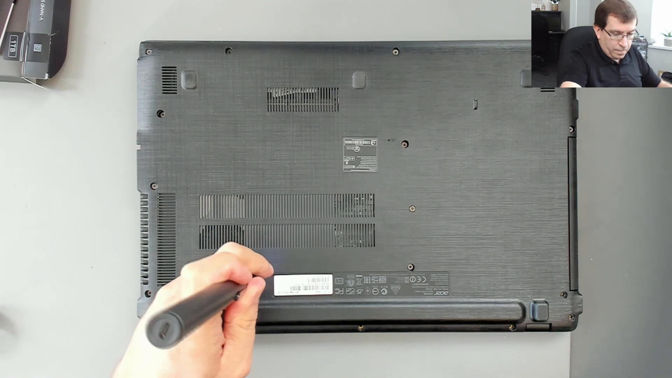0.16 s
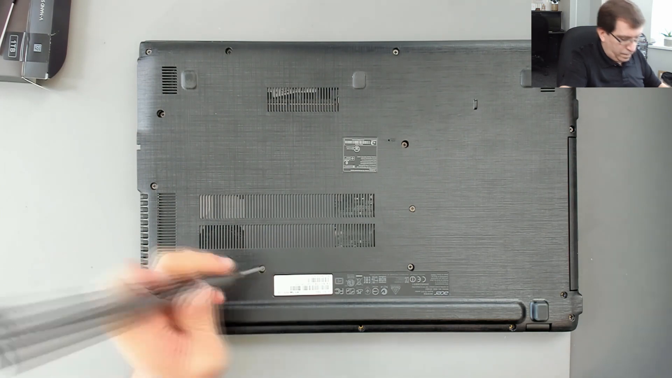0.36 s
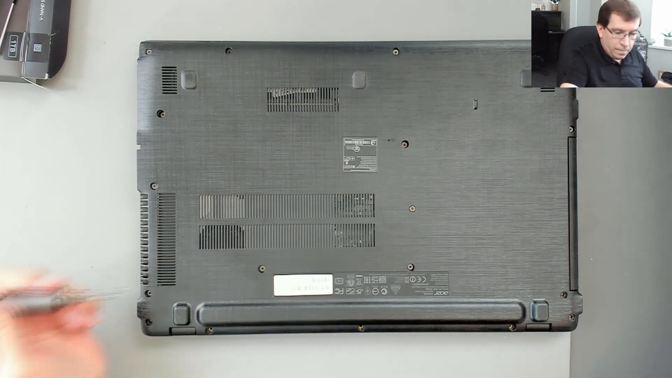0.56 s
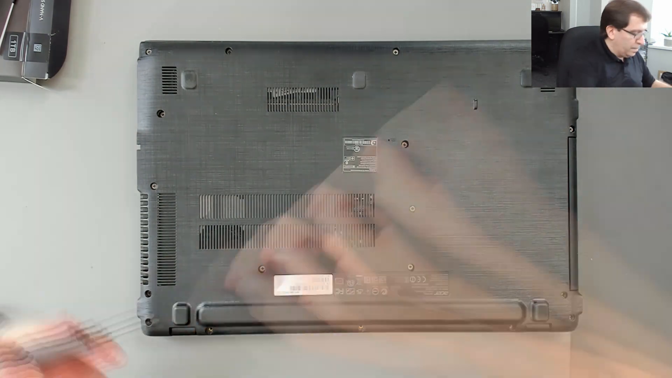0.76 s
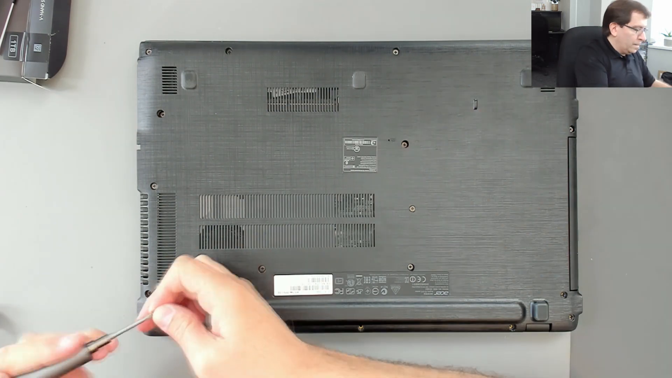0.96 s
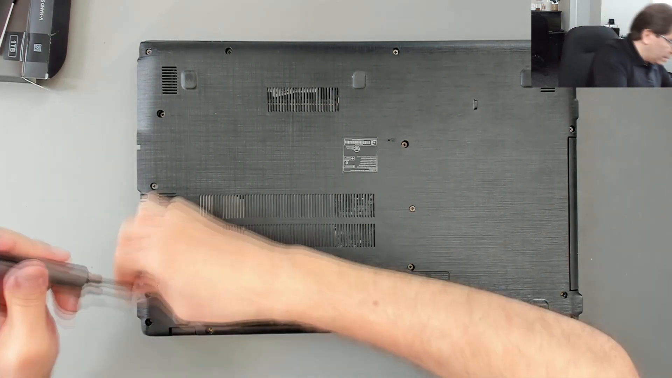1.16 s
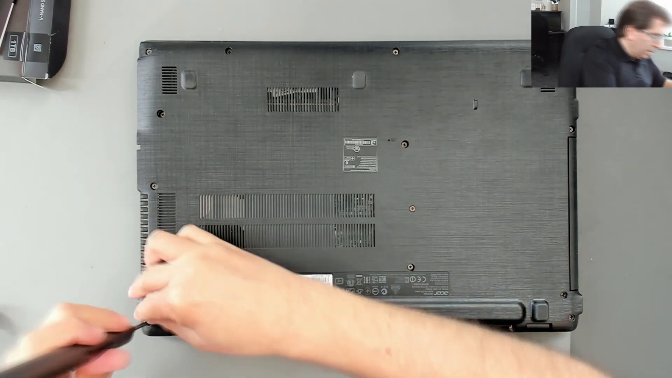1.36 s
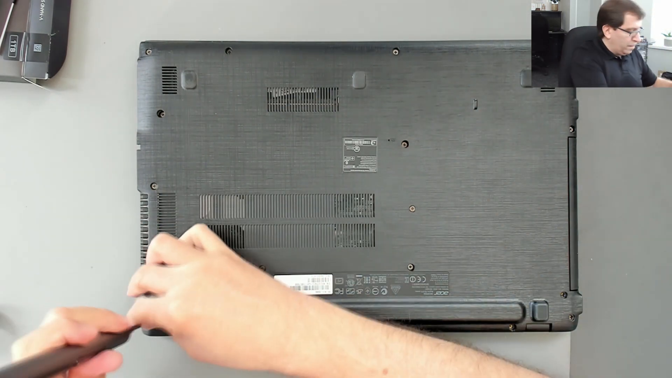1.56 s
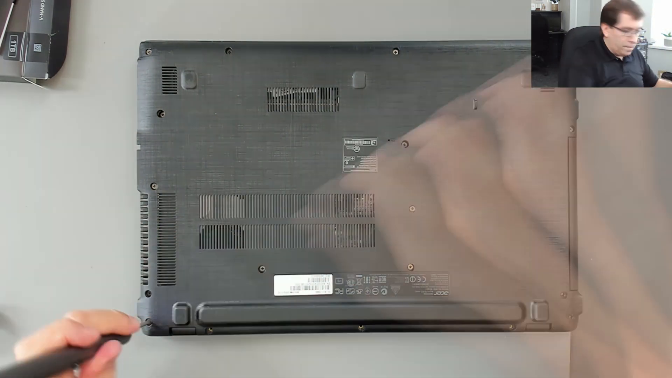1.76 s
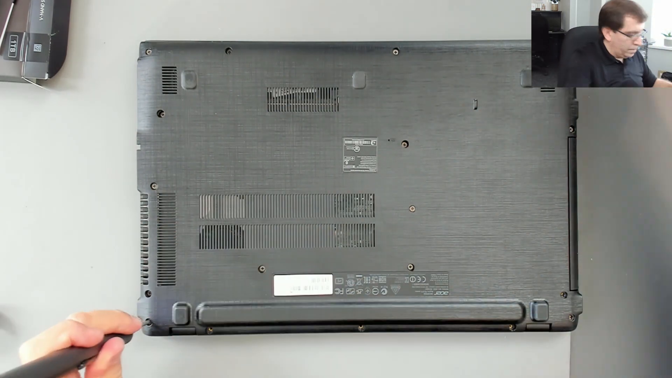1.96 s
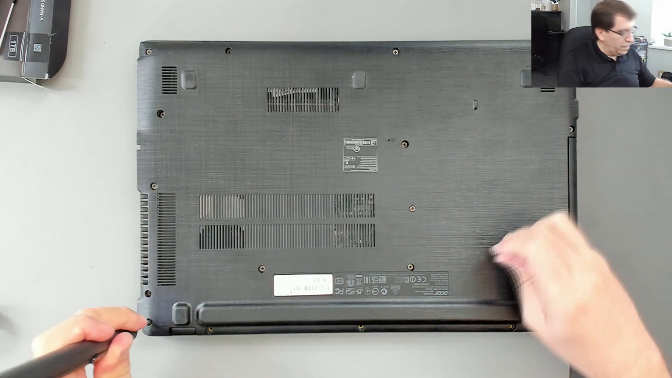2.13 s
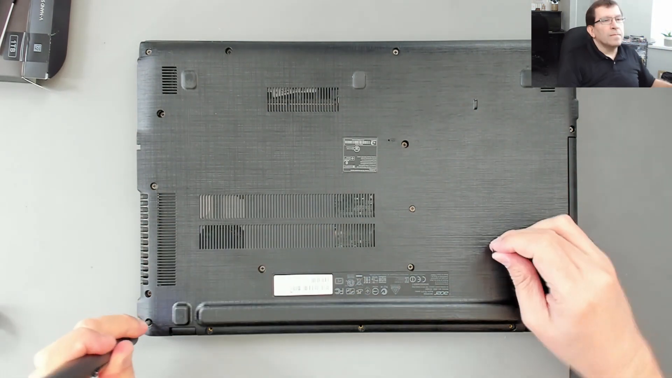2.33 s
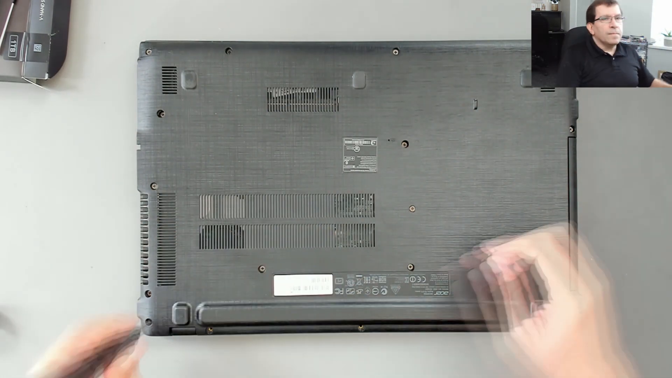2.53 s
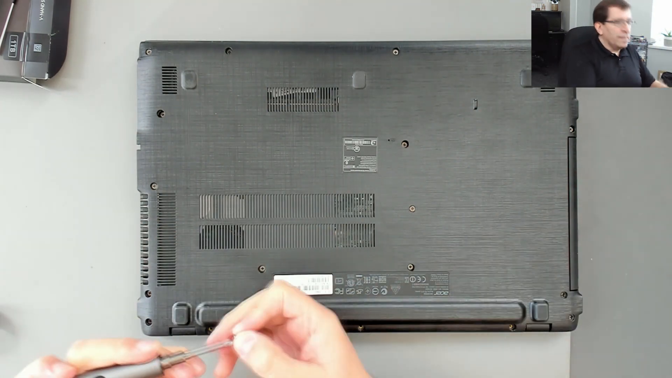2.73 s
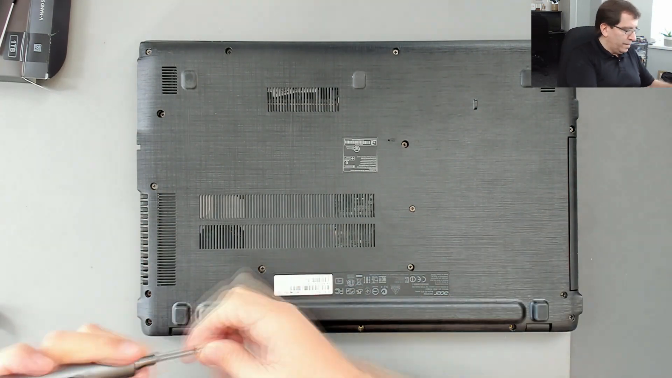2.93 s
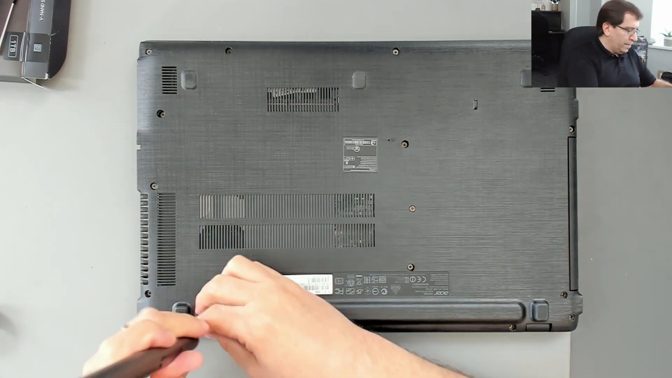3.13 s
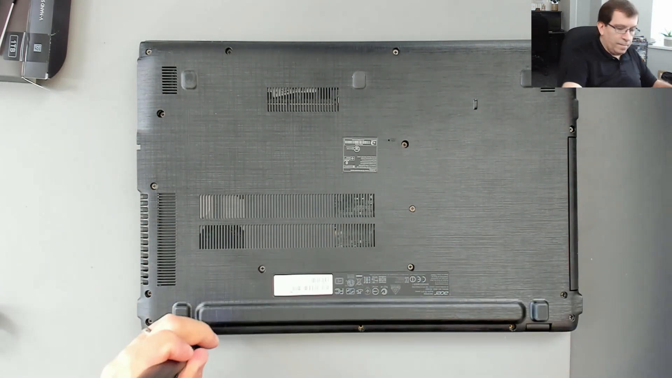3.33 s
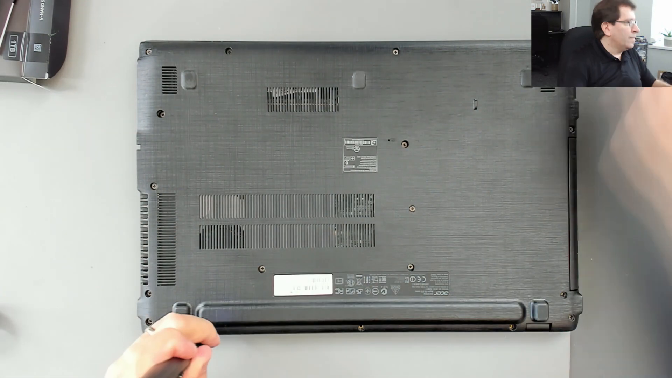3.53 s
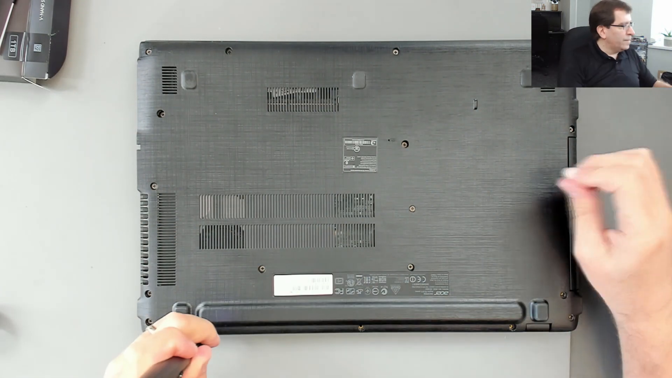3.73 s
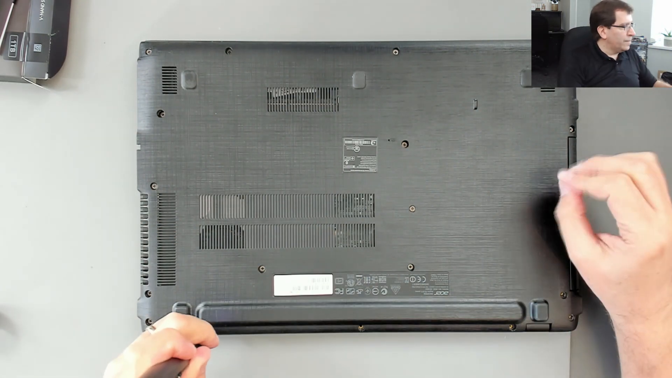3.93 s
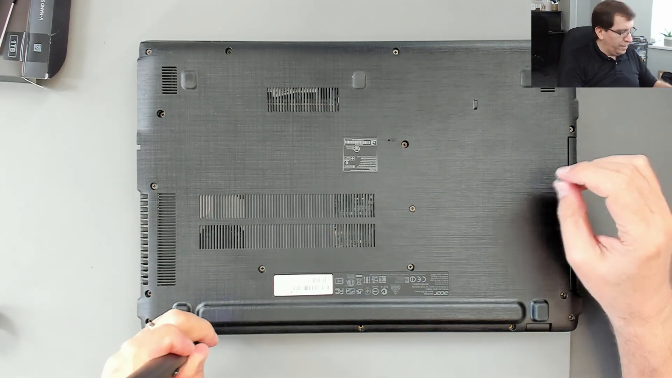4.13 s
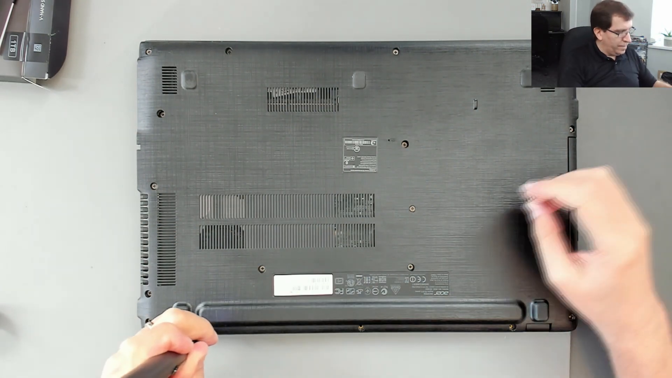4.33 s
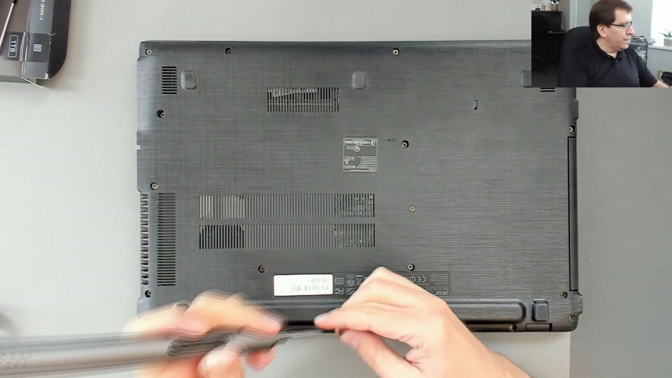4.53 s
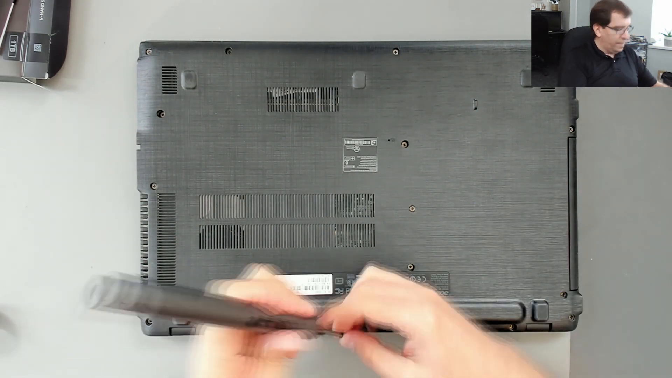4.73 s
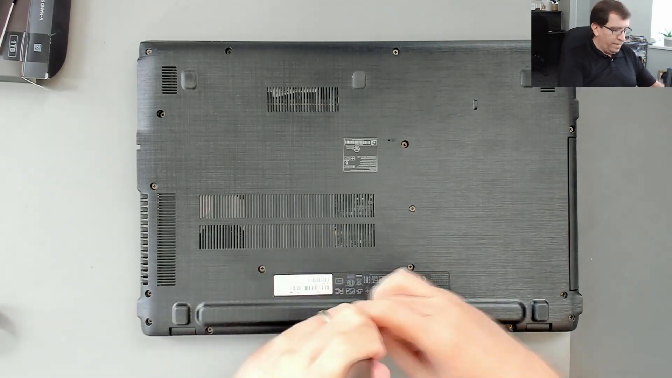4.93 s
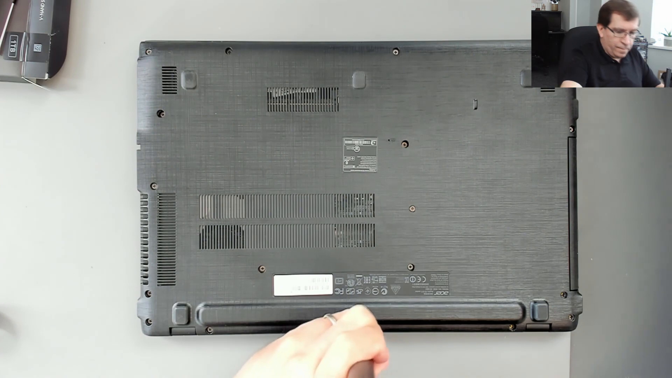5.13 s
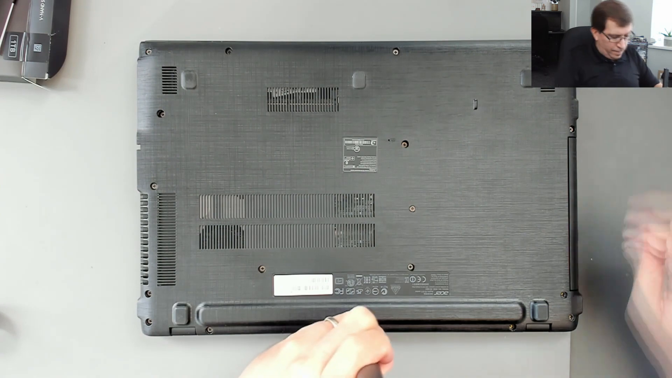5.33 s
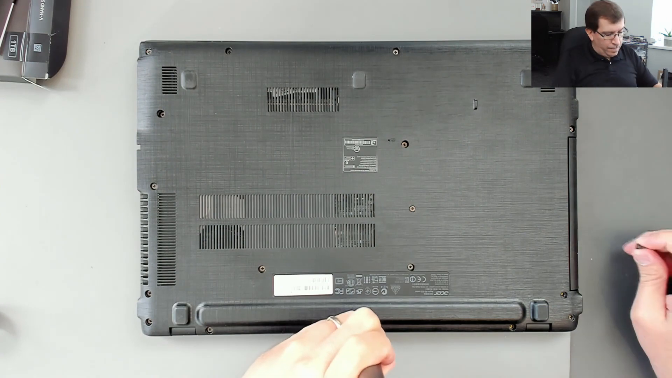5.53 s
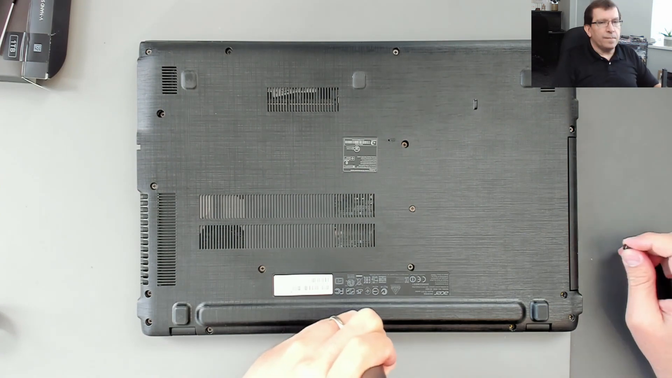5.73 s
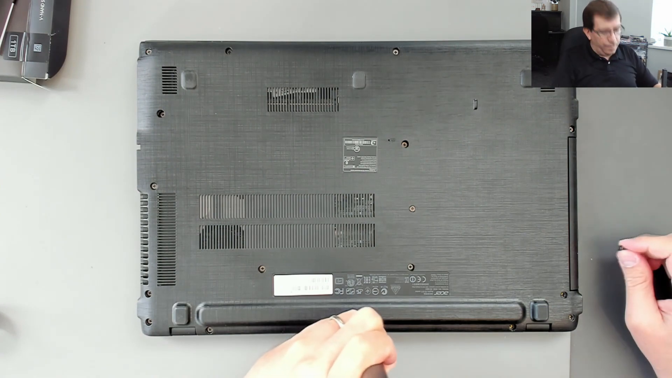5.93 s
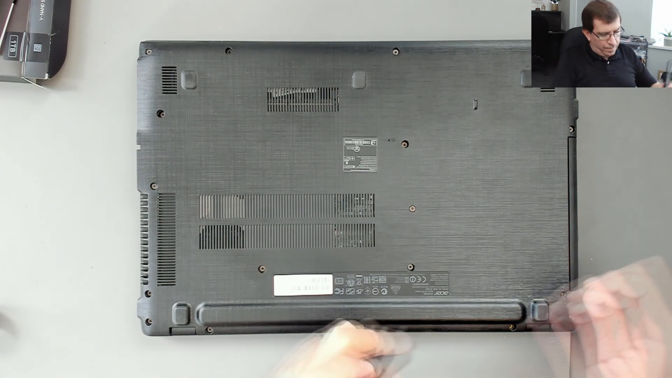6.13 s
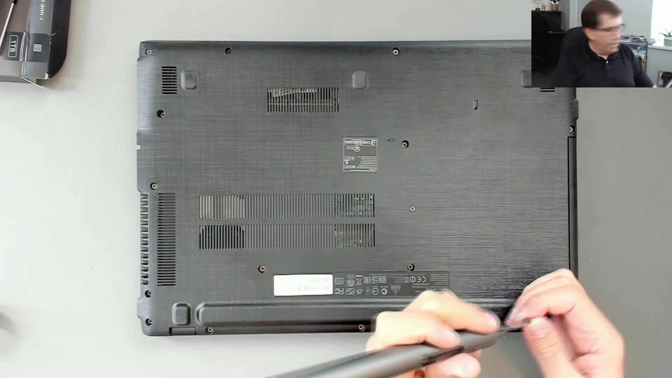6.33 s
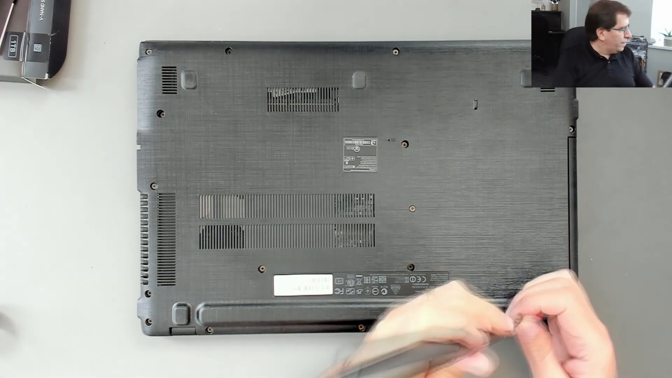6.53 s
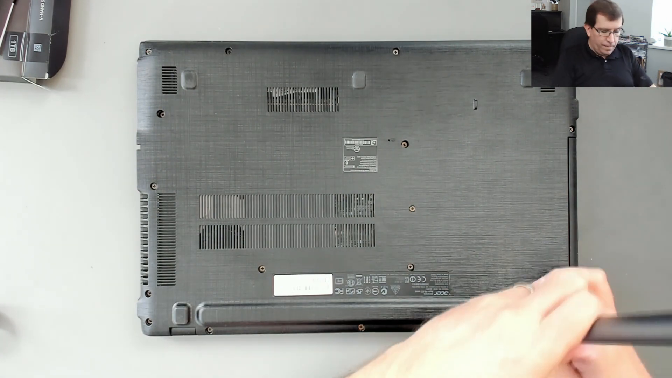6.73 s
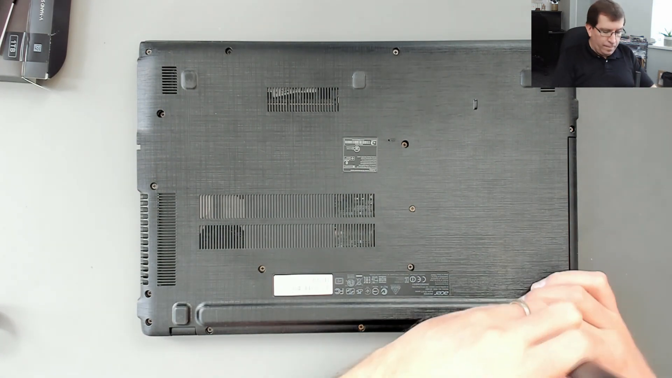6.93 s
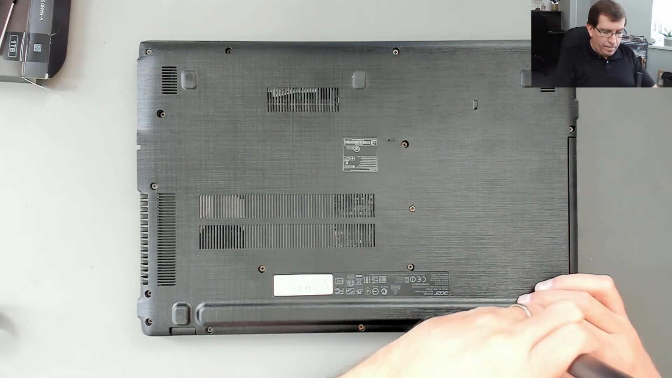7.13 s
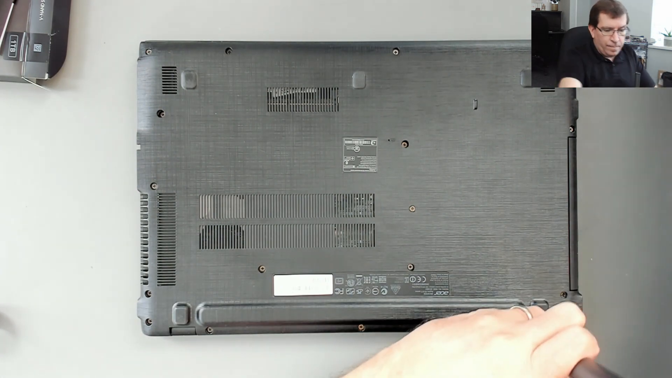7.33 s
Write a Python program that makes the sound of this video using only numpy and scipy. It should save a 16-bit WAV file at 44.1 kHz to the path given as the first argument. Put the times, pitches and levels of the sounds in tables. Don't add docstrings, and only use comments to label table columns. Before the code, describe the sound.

A small electric screwdriver whines and rattles in five short bursts on a hollow plastic laptop cover, with soft knocks, scuffs and tiny metal ticks between.

```python
import sys
import numpy as np
from scipy import signal
from scipy.fft import rfft, irfft, next_fast_len
from scipy.io import wavfile
from scipy.ndimage import uniform_filter1d

SR = 44100
rng = np.random.default_rng(int(sys.argv[2]) if len(sys.argv) > 2 else 0)


def field_ratio(decibels):
    return 10 ** (np.asarray(decibels, dtype=float) / 20)


def wrap_up_sound(samples):
    columns = np.atleast_2d(samples).T
    tamed = np.clip(columns, -1, 1)
    steps = np.round(tamed * 32767).astype(np.int16)
    wavfile.write(sys.argv[1], SR, steps)


N = 325458

# switch on t/s, switch off t/s, gear rattle level/dB, coasting time/s,
# bench sway level/dB as the screw seats
MOTOR_RUNS = [
    (-.1, .28, -38, .03, -52),
    (1.752, 2.52, -38, .075, -44),
    (3.238, 4.41, -38, .085, -39),
    (5.048, 6.11, -37, .075, -45),
    (7.075, 8.0, -39, .05, -46),
]


def rms_one(x):
    return x / np.sqrt(np.mean(x ** 2) + 1e-20)


def in_time(rows):
    s, *columns = np.transpose(rows)
    return [np.interp(np.arange(N) / SR, s, column) for column in columns]


def per_run(values):
    changes = [int((run[1] + .3) * SR) for run in MOTOR_RUNS[:-1]]
    return np.repeat(values, np.diff([0, *changes, N]))


def running(spin_up_s, coast_share, lead_s=0):
    on, off, _, coast_s, _ = (per_run(column) for column in np.transpose(MOTOR_RUNS))
    t = np.arange(N) / SR
    up = 40 * np.exp(np.minimum((on - t) / spin_up_s, 3))
    down = 40 * np.clip((t + lead_s - off) / (coast_s * coast_share), 0, 3) ** 2.4
    progress = np.clip((t - on) / (off - on), 0, 1)
    return -up - down, progress


def drift(rate):
    r = np.exp(-80 * np.pi * rate / SR)
    slow = signal.lfilter([1], [1, -2 * r, r * r], rng.standard_normal(N // 40 + 2002))[2000:]
    return np.interp(np.arange(N) / 40, np.arange(len(slow)), rms_one(slow))


def swells(s, level_db, rise_s, fall_s):
    t = np.arange(0, N + 40, 40)[:, None] / SR
    steepest = np.maximum((s - t) / rise_s, (t - s) / fall_s)
    total = field_ratio(level_db - 30 * steepest).sum(axis=1)
    return np.interp(np.arange(N) / 40, np.arange(len(total)), total)


def coloured(x, spectrum):
    size = next_fast_len(len(x))
    hz, level_db = np.transpose(spectrum)
    bin_hz = np.arange(size // 2 + 1) * SR / size
    shape = np.interp(np.log(bin_hz + 1), np.log(hz), level_db, -90, -90)
    return rms_one(irfft(rfft(x, size) * field_ratio(shape), size)[:len(x)])


def resonance(x, hz, width):
    r = np.exp(-np.pi * width / SR)
    feedback = [1, -2 * r * np.cos(2 * np.pi * hz / SR), r * r]
    return (1 - r * r) / 2 * signal.lfilter([1, 0, -1], feedback, x)


def resonant(x, peaks):
    return rms_one(sum((-1) ** k * field_ratio(db) * resonance(x, hz, width)
                       for k, (hz, width, db) in enumerate(peaks)))


def grains(spread_db):
    return rng.standard_normal(N) * field_ratio(spread_db * np.minimum(rng.exponential(1, N), 4))


def strike(times, levels_db):
    clicks = np.zeros(N)
    clicks[(np.asarray(times) * SR).astype(int)] = field_ratio(levels_db)
    return clicks


def struck(modes, rise_s):
    t = np.arange(int(.08 * SR)) / SR
    ringing = sum(field_ratio(db - 60 * t / t60) * np.sin(2 * np.pi * hz * t) for hz, db, t60 in modes)
    return ringing * (1 - np.exp(-t / rise_s)) ** 2


def crack(clicks, t60):
    hiss = coloured(rng.standard_normal(N), [(1500, 8.5), (3000, 3), (6000, -3), (15500, -11)])
    envelope = signal.lfilter([1], [1, -field_ratio(-60 / (t60 * SR))], clicks + 1e-18)
    return hiss * uniform_filter1d(envelope, size=120, origin=20)


def whine(rattle_db):
    # t/s, mesh f/Hz, wobble/Hz, pressure on the screw level/dB
    motor_speed = [
        [(0, 648.3, 5, -1), (.2, 636, 5, -.1), (.27, 628, 3.06, -18)],
        [(1.79, 604, 2.2, -8), (1.9, 638, 3.5, -14), (2.08, 633, 3, -12), (2.15, 631, 3, -2),
         (2.23, 630, 3, -4), (2.3, 629, 2.4, -.1), (2.4, 627, 2.4, -3), (2.48, 622, 2.4, -8),
         (2.56, 602.4, 3.5, -20)],
        [(3.27, 618, 2.4, -6), (3.4, 629, 3.4, -3), (3.58, 628, 8.1, -.1), (3.75, 620, 1.8, -1),
         (3.84, 602, 2, -3), (3.88, 590, 2, -18), (4.13, 585, 2.7, -11), (4.3, 610.4, 2.3, -11),
         (4.4, 621, 1.2, -6)],
        [(5.1, 634, 3.4, -12), (5.3, 642, 2.5, -8), (5.36, 642, 3, -1), (5.58, 642, 6, -.1),
         (5.8, 619.6, 15, -8), (6.05, 629, 16, -7), (6.12, 633, 16, -24)],
        [(7.1, 585, 3.5, -14), (7.145, 632, 3.5, -12), (7.18, 616, 3.5, -8), (7.24, 638, 5.6, -3),
         (7.38, 638.6, 1, -.1)],
    ]
    # level/dB of orders 1, 2, 3, 5, 12
    orders_db = [(-56, -49, -53.5, -43, -58), (-47, -40.5, -53, -58, -63), (-45.5, -38, -39, -43, -51),
                 (-47.5, -39.5, -38, -43, -68), (-52, -40, -44, -39, -46)]
    orders_follow = (.65, 1.15, .62, .22, .05)
    bind_times = [0.148, 2.222, 3.632, 5.833, 7.19]
    # multiple of mesh f, level/dB under the gear rattle
    upper_orders = [(4, -16.5), (7, -23.5), (8, -15), (10, -19.5)]
    turns_hz = 9.8
    barrel_hz, barrel_width_hz = 3170, 170

    hz, wobble_hz, pressure_db = in_time([row for run in motor_speed for row in run])
    on_db, progress = running(spin_up_s=.027, coast_share=.3, lead_s=.02)
    levels_db = [per_run(db) + share * pressure_db + on_db
                 for db, share in zip(np.transpose(orders_db), orders_follow)]
    off_barrel_db = 10 * np.log10(1 + ((5 * hz - barrel_hz) / barrel_width_hz) ** 6)
    seating_fade_db = 8 * progress ** 3
    levels_db[3] = levels_db[3] - off_barrel_db - seating_fade_db
    levels_db[4] = levels_db[4] - 26 * np.clip(1 - progress / .38, 0, 1)

    bind = wobble_hz * np.cos(2 * np.pi * turns_hz * (np.arange(N) / SR - per_run(bind_times)))
    phase = 2 * np.pi * np.cumsum(hz * (1 + 0.00196 * drift(26.02)) - bind) / SR
    clean = 0
    for k, db in zip((1, 2, 3, 5, 12), levels_db):
        level = field_ratio(db + 4.2 + 4.3 * drift(22))
        clean = clean + level * np.sin(k * phase + 0.13 * drift(22)) * (1 + 0.019 * k * drift(72))
    faint = 0
    for k, db in upper_orders:
        level = field_ratio(rattle_db + db + 3.76 * drift(6.4))
        faint = faint + level * (0.72 + drift(130)) * np.sin(k * phase)
    return clean + faint, phase, bind, pressure_db


def flaws(phase):
    angle = phase / (10 * np.pi) % 1
    patterns = rng.standard_normal((2, 350))
    patterns = patterns + field_ratio(-9) * np.tile(patterns[:, :70], 5)
    first, second = (np.interp(angle, np.arange(350) / 350, p, period=1) for p in patterns)
    blend = 1.2 * drift(4)
    return rms_one(first * np.cos(blend) + second * np.sin(blend))


def screwdriver():
    # f/Hz, density level/dB per Hz
    teeth_spectrum = [(300, -33), (450, -7), (900, -6.5), (2000, -5), (5500, -8.5), (6400, -5),
                      (12000, -16), (15900, -18)]
    # f/Hz, width/Hz, then level/dB in each run as grip and place change
    housing_modes = [(1782, 1050, -15, -12, -3, -2.5, -1), (2460, 400, -18.5, -5, -3.5, -7, 1.5),
                     (3182, 460, -13.5, -10, .5, 1.2, 5), (4120, 1400, -10, -5, 1, 1.5, 1),
                     (4700, 350, -12, -8, -3, -3, -5), (5310, 600, -9.5, -1.5, -3, -6, 2.5),
                     (7520, 1800, -13, -22.5, -7.5, -11.5, -3), (8680, 1100, -11, -15, -8, -6.5, 0),
                     (9500, 1000, 1.5, -5.5, -1, -3, 3), (10300, 600, -3, -12, -1, -5, -1),
                     (11000, 500, -8, -14, -7, -1.5, -3), (11500, 1900, -3.5, -9.5, -1.5, -3, 3.5),
                     (13100, 1800, -4, -12, -5, -1.5, 1), (14900, 1300, -1, -12, -3.5, -6, -3)]
    housing_gains = [(0, 0, -3, 0, 0), (0, -8, 0, 0, 0), (0, 0, -5, 3, 0), (0, 3, 0, 3, 0), (0, 0, 0, 0, 0),
                     (0, 3, -5, 4, 0), (0, 0, 3, 0, 0), (0, 0, -5, 2, 0), (0, 5, 1, 3, 0), (0, 0, 3, 0, 0),
                     (0, 0, 3, 5, 0), (0, 0, 3, 0, 0), (0, -2, -3, -3, 0), (0, -2, -4, 1, 0)]

    on_db, progress = running(spin_up_s=.016, coast_share=1)
    level_db = per_run([run[2] for run in MOTOR_RUNS]) + 2.5 * (progress - .5) + on_db
    bright_first_db, bright_last_db = .6, 6.5
    bright_db = bright_first_db + (bright_last_db - bright_first_db) * progress
    tone, phase, bind, pressure_db = whine(level_db)
    pulsing = rms_one(grains(spread_db=-0.5)) * (1 + 0.17 * np.cos(phase))
    teeth = coloured(pulsing + field_ratio(-1.0) * flaws(phase), teeth_spectrum)

    rattle = field_ratio(-2) * teeth
    stall = np.exp(-((np.arange(N) / SR - per_run([run[1] for run in MOTOR_RUNS])) / .025) ** 2)
    shifts = [drift(3.5) for _ in range(11)]
    for k, ((hz, width, *run_db), gains_db) in enumerate(zip(housing_modes, housing_gains)):
        swell_db = 2.1 * shifts[k % 11] + per_run(gains_db) * (progress - .5)
        if 10500 < hz < 11200:
            swell_db = swell_db + .3 * bind
        if hz < 4000:
            swell_db = swell_db + .4 * (pressure_db + 6.0)
        if hz > 11200:
            swell_db = swell_db + 5 * stall
        ringing = resonance(resonance(teeth, hz, width), hz, 2 * width)
        rattle = rattle + field_ratio(per_run(run_db) + swell_db + 2.5) * ringing

    low = signal.sosfilt(signal.butter(2, 1800, fs=SR, output="sos"), rattle)
    high = signal.sosfilt(signal.butter(2, 6000, "high", fs=SR, output="sos"), rattle)
    tilted = rattle + low * (field_ratio(-bright_db) - 1) + high * (field_ratio(bright_db) - 1)
    return tone + field_ratio(level_db - 1.0 + 0.69 * drift(20)) * tilted


def bench():
    # t/s, sway level/dB, bench top level/dB, cover level/dB,
    # time/s in which the sway dies 30 dB
    bumps = [(.02, -52, -55, -55, .4), (.33, -60, -52, -58, .2), (.5, -55, -53, -57, .25),
             (.75, -45, -39.5, -43.5, .12), (.91, -40.5, -55, -54.5, .09), (1.2, -60, -60, -60, .3),
             (1.36, -54, -58, -52, .3), (1.46, -42, -39, -48, .15), (1.6, -33, -35, -40.5, .3),
             (1.81, -45, -50, -38, .1), (1.71, -28, -22, -34, .22), (1.99, -42, -52, -54, .15),
             (2.525, -52, -54, -30, .1), (3.03, -29, -39, -42, .11), (3.2, -30, -26, -40, .22),
             (4.69, -61.5, -62, -58.5, .4), (4.94, -31, -47, -28, .2), (5.0, -24, -16.5, -32.5, .22),
             (6.19, -44, -42, -44, .15), (6.35, -58, -54, -53, .2), (6.5, -55, -53, -52, .2),
             (6.63, -58, -54, -53, .2), (6.82, -36, -34.5, -33, .1), (6.96, -35, -39, -32, .15),
             (7.0, -33, -51, -40.5, .1), (7.06, -47, -33, -35, .2)]
    # sway, bench top and cover level/dB
    rest_db = (-78, -63, -64)
    cover_driven_db = (-45, -43.5, -44, -48, -45)
    # f/Hz, width/Hz, level/dB
    top_modes = [(60.3, 7.6, -3), (108, 31, -3.5), (125.4, 24.2, -3)]
    # f/Hz, width/Hz, level/dB
    cover_modes = [(171, 24, -9), (238, 60, -3.5), (281, 13.3, 2.5), (345.6, 46, -11)]
    rise_s, sway_hz = .045, 28.8

    s, sway_db, top_db, cover_db, dies_s = np.transpose(bumps)
    on_db, progress = running(spin_up_s=.016, coast_share=1.6)
    seating = field_ratio(per_run([run[4] for run in MOTOR_RUNS]) - 18 * (1 - progress) + on_db)
    sway = field_ratio(rest_db[0]) + seating + swells(s, sway_db, rise_s, dies_s)
    top = field_ratio(rest_db[1]) + field_ratio(-49.5 + on_db) + swells(s, top_db, rise_s, fall_s=.06)
    cover_driven = field_ratio(per_run(cover_driven_db) + on_db)
    cover = field_ratio(rest_db[2]) + cover_driven + swells(s, cover_db, rise_s, fall_s=.125)

    sway_phase = 2 * np.pi * sway_hz * np.arange(N) / SR + 0.94 + 1.4 * drift(3.2)
    sway = field_ratio(6.5) * sway * np.sin(sway_phase)
    top = field_ratio(-1.1) * top * resonant(rng.standard_normal(N), top_modes)
    cover = field_ratio(-5.0 + 2.5 * drift(5.1)) * cover * resonant(rng.standard_normal(N), cover_modes)
    return sway + top + cover


def hands():
    # t/s, rubbing level/dB, rustle level/dB, time/s to swell 30 dB, time/s to die 30 dB
    scuffs = [(.29, -41, -52, .03, .04), (.385, -51.5, -64, .08, .05), (.58, -59, -65, .2, .17),
              (.755, -45, -60.5, .03, .13), (.88, -53, -67, .04, .2), (1.07, -63, -72, .1, .07),
              (1.17, -64, -75, .08, .1), (1.24, -64, -74, .05, .05), (1.36, -50, -66, .05, .2),
              (1.445, -43, -62, .03, .08), (1.48, -38, -59, .05, .05), (1.585, -44, -64, .05, .08),
              (1.645, -46, -68, .06, .06), (1.69, -27, -49, .045, .06), (1.73, -31, -38, .04, .1),
              (2.57, -46, -54, .06, .04), (2.68, -64, -73, .2, .3), (3.012, -41, -49, .028, .05),
              (3.05, -48, -64, .06, .12), (3.2, -38, -49, .055, .17), (4.487, -43, -52, .03, .045),
              (4.705, -60, -63, .06, .08), (4.93, -43, -64, .04, .13), (5.01, -31, -46, .07, .1),
              (6.18, -41.5, -52, .06, .06), (6.227, -52, -60, .05, .06), (6.69, -59, -68, .09, .09),
              (6.815, -43, -60, .08, .1), (6.85, -55, -65, .05, .04), (6.935, -44, -65, .02, .17),
              (7.05, -31, -58, .04, .06)]
    hands_rest_db = (-68, -85)
    # f/Hz, density level/dB per Hz
    rub_spectrum = [(350, 0), (500, -1.5), (900, 5), (1450, -1.5), (2150, -13), (3200, -50)]
    # f/Hz, density level/dB per Hz
    rustle_spectrum = [(1500, -5.5), (2300, -7.5), (3700, -7), (4300, -1.5), (5200, -11), (9000, -12.5),
                       (13000, -17.5)]

    s, rub_db, rustle_db, rise_s, fall_s = np.transpose(scuffs)
    rubbing = field_ratio(hands_rest_db[0]) + swells(s, rub_db, rise_s, fall_s)
    rustling = field_ratio(hands_rest_db[1]) + swells(s, rustle_db, rise_s, fall_s)
    skin = coloured(rng.standard_normal(N), rub_spectrum)
    panel_hum = field_ratio(5.5) * resonance(skin, 626, 36)
    rub = field_ratio(-8.5) * rubbing * (skin + panel_hum)
    flicker = field_ratio(2.2 * drift(40))
    rustle = field_ratio(-7.0) * flicker * rustling * coloured(grains(spread_db=2.0), rustle_spectrum)
    return rub + rustle


def clinks():
    # t/s, peak level/dB
    contacts = [(0.3396, -57), (0.8704, -70), (1.0196, -70), (1.4082, -60), (1.4321, -69), (1.4636, -52),
                (1.5279, -64), (1.5674, -64), (1.6087, -63), (1.6254, -67), (2.7112, -74), (4.4864, -55),
                (4.6069, -79), (4.6244, -74), (4.6744, -72), (4.6897, -57), (4.9182, -58), (6.3374, -68),
                (6.351, -66), (6.4378, -71), (6.4444, -69), (6.4614, -72), (6.4802, -66), (6.8064, -65),
                (6.9304, -64)]
    # f/Hz, density level/dB per Hz
    clink_spectrum = [(3000, -12), (4300, -4), (6500, -12), (9500, 0), (12000, -2), (14500, -12)]
    # t/s, level/dB, time/s to swell 30 dB, time/s to die 30 dB
    bit_sings = [
        (3.13, -88, .15, .1),
        (6.75, -87, .15, .3),
        (6.84, -83, .15, .2),
        (6.94, -80, .06, .1),
    ]

    s, level_db = np.transpose(contacts)
    decay = field_ratio(-60 / (0.012 * SR))
    envelope = signal.lfilter([1], [1, -decay], strike(s, level_db - 4.0) + 1e-18)
    clink = coloured(rng.standard_normal(N), clink_spectrum) * uniform_filter1d(envelope, size=40)
    ring = rms_one(resonance(rng.standard_normal(N), 9620, 40)) * swells(*np.transpose(bit_sings))
    return clink + ring


def ticks():
    # t/s, peak level/dB, ring f/Hz
    bit_ticks = [(0.3576, -54, 3330), (0.7564, -51, 3320), (0.9413, -56, 2900), (1.481, -46, 3400),
                 (3.1868, -36.5, 3100), (3.252, -36, 2500), (4.4812, -35, 3030), (4.6578, -61, 4190),
                 (4.7072, -57, 4440), (4.9462, -45, 3350), (5.0733, -36, 4230), (5.1157, -23, 4100),
                 (6.1434, -40, 1500), (6.1669, -27, 4300), (6.3335, -60.5, 5110), (6.4537, -61, 4590),
                 (6.8608, -61, 3490), (6.9466, -49, 3280), (7.011, -52, 3110), (7.0319, -43, 3440),
                 (7.0494, -25.5, 3060)]
    s, level_db, ring_hz = np.transpose(bit_ticks)
    out = crack(strike(s, level_db - 3), t60=0.015)
    t = np.arange(int(.03 * SR)) / SR
    for at, db, hz in zip((s * SR).astype(int), level_db, ring_hz):
        out[at:at + len(t)] += field_ratio(db - 11 - 60 * t / .018) * np.sin(2 * np.pi * hz * t)
    return out


def knocks():
    # t/s, shell level/dB, panel level/dB, panel f/Hz, crack level/dB
    cover_knocks = [(0.736, -47, -53, 1160, -76), (1.341, -36.5, -54, 590, -71),
                    (1.443, -28, -40, 573, -72), (1.473, -26.5, -51, 970, -59), (1.524, -41, -50, 650, -71),
                    (1.573, -31, -44, 650, -66), (1.633, -40, -48, 630, -66), (1.67, -19, -31, 600, -47),
                    (1.685, -13.5, -30, 1400, -33), (1.691, -18, -27, 570, -63),
                    (1.717, -4.5, -20.5, 764, -32.5), (3.04, -43, -46, 616, -80),
                    (3.171, -38, -42, 1180, -61), (3.194, -24.5, -44, 980, -60),
                    (3.204, -52, -41, 635, -37), (4.914, -28.5, -41, 890, -65),
                    (4.98, -26.5, -30, 1286, -39), (4.99, -47, -31, 1420, -42),
                    (5.005, -24, -22.5, 1147, -35), (5.022, -50, -25, 1310, -44),
                    (6.804, -45, -55, 1000, -66), (6.814, -26.5, -55, 900, -63),
                    (6.932, -35, -52, 1330, -72), (7.035, -32, -42, 1357, -64),
                    (7.049, -31, -34, 1450, -60)]
    # f/Hz, level/dB, t60/s
    shell_modes = [(237.8, 5, 0.03), (284, 10, 0.013), (178, -5, 0.015)]
    # multiple of panel f, level/dB, t60/s
    panel_modes = [(1, 3.5, 0.036), (1.37, -3, 0.022), (.72, -2.5, 0.042), (1.9, -5, 0.015)]

    s, shell_db, panel_db, panel_hz, crack_db = np.transpose(cover_knocks)
    out = crack(strike(s, crack_db + 4.5), t60=0.024)
    out += signal.fftconvolve(strike(s, shell_db + 14.5), struck(shell_modes, rise_s=0.0071))[:N]
    for at, level_db, hz in zip((s * SR).astype(int), panel_db, panel_hz):
        panel = struck([(k * hz, db, t60) for k, db, t60 in panel_modes], rise_s=0.0017)
        out[at:at + len(panel)] += field_ratio(level_db + 5.0) * panel
    return out


def scene():
    # f/Hz, density level/dB per Hz
    room_spectrum = [(20, -3.5), (52, 5), (80, -10.5), (120, -3.5), (165, -19), (290, -1), (420, -9.5),
                     (700, -12.5), (1350, -17.5), (2100, -33.5), (4000, -36.5), (12800, -48)]
    room = field_ratio(-63.5) * coloured(rng.standard_normal(N), room_spectrum)
    mono = screwdriver() + bench() + hands() + clinks() + ticks() + knocks() + room
    return np.array([mono, mono])


def band_limit(x):
    return signal.sosfilt(signal.butter(12, 16810, fs=SR, output="sos"), x)


def record(dry):
    cut = signal.sosfilt(signal.cheby2(20, 80, 16050, fs=SR, output="sos"), dry)
    mix = cut + .0008
    return band_limit(mix)


dry = scene()
out = record(dry)
wrap_up_sound(out)
```